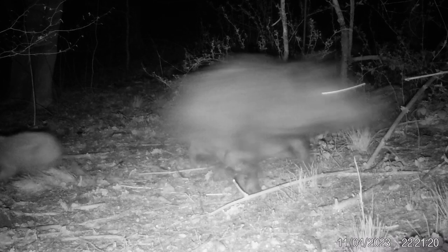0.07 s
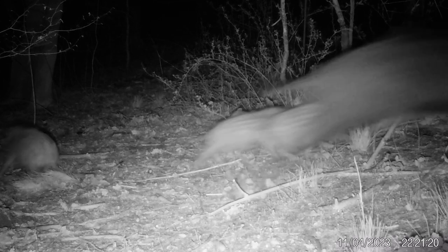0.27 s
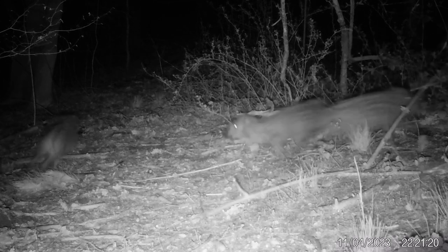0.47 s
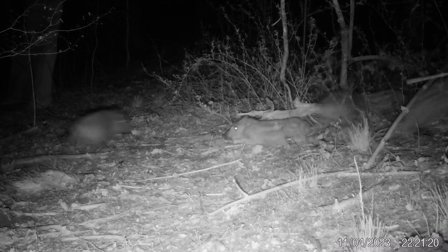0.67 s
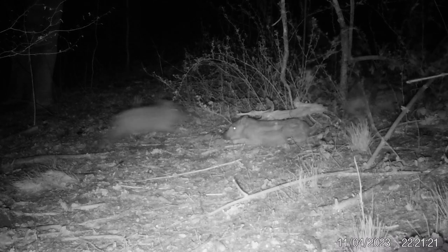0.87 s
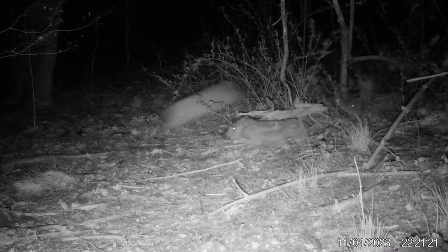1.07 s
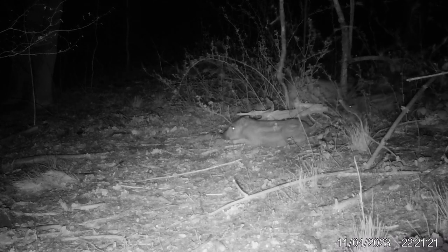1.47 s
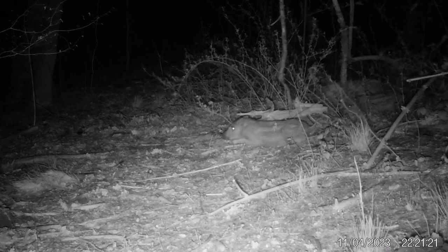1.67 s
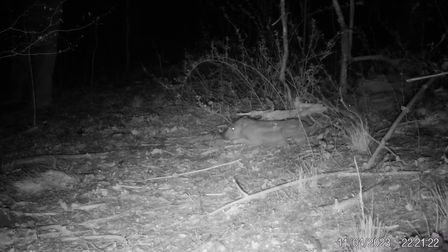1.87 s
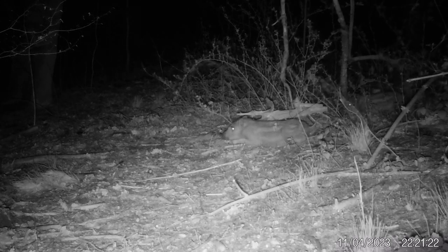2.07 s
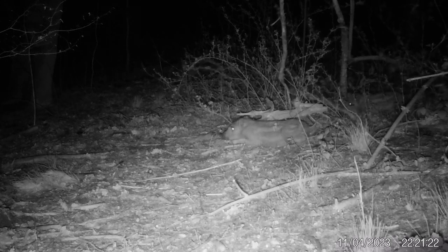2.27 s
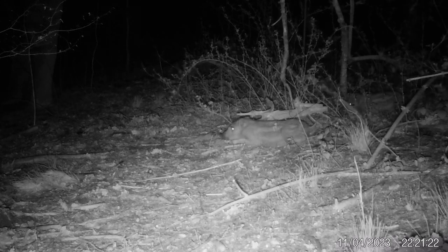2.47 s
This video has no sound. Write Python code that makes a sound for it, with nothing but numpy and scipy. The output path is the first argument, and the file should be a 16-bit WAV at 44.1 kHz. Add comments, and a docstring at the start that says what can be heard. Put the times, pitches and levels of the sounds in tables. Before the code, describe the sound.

Wild boars run through woodland leaf litter, starting near the microphone with snapping twigs and one loud branch crack. Their scuffing and low rumble fade as the crackling leaves grow duller with distance, above a faint hiss.

```python
"""Wild boars bolt past and away through dry leaf litter in a wood at night.
Crushed leaves crackle and dull with distance; the microphone housing adds peaks near 3.7 and 6.6 kHz.
Hooves and bodies scuff over a low rumble, twigs snap, and a dry branch breaks close by and rings.
The trunks scatter each crack back. A faint, steady hiss lies under it all."""
import sys
import numpy as np
from scipy import signal
from scipy.fft import rfft, irfft
from scipy.io import wavfile

SR = 44100
rng = np.random.default_rng(int(sys.argv[2]) if len(sys.argv) > 2 else 0)


def generate_wav(sig):
    """Save sig (samples, or channels by samples) to the path in sys.argv[1] as 16-bit PCM at SR."""
    pcm = np.round(np.clip(np.atleast_2d(sig).T, -1, 1) * 32767).astype(np.int16)
    wavfile.write(sys.argv[1], SR, pcm)


N = 110250

# tone colour of leaf and twig crackle as heard through the microphone housing: f/Hz, level/dB
CRACKLE_COLOUR = [(600, -38), (1400, -12), (1750, -17.5), (2300, -14), (3100, -5), (3750, 3), (4060, -2.5),
                  (4400, -1), (5160, -8), (5850, -8.5), (6200, -1), (6540, 1.5), (7210, -2.5), (8000, -2),
                  (9910, -9), (11000, -21), (12000, -32.5), (12500, -46)]


def amp(db):
    """Decibels to gain."""
    return 10 ** (np.asarray(db) / 20)


def unit(x):
    """Scale to rms 1."""
    return x / np.sqrt(np.mean(x ** 2) + 1e-20)


def along(points, hz):
    """Interpolate (f/Hz, value) points on a log frequency axis."""
    f, values = np.transpose(points)
    return np.interp(np.log(hz + 1), np.log(f + 1), values)


def fader(points):
    """Gain for each sample from (t/s, level/dB) points."""
    return amp(np.interp(np.arange(N) / SR, *np.transpose(points)))


def coloured(x, spectrum, pitch_hz=1000, fall_db=0):
    """EQ of unit power gain; fall_db cuts that much per octave either side of pitch_hz."""
    hz = np.fft.rfftfreq(2 * N, 1 / SR)
    octaves_off = np.abs(np.log2((hz + 1) / pitch_hz))
    gain = unit(amp(along(spectrum, hz) - fall_db * octaves_off))
    # minimum phase, so nothing rings ahead of an attack
    cepstrum = irfft(np.log(np.maximum(gain, 1e-5)))
    cepstrum[1:N] *= 2
    cepstrum[N + 1:] = 0
    return irfft(rfft(x, 2 * N) * np.exp(rfft(cepstrum)))[:N]


def noise(spectrum):
    """Steady coloured noise of rms 1."""
    return unit(coloured(rng.standard_normal(N), spectrum))


def decay(t, t60):
    """Exponential fall of 60 dB in t60 seconds."""
    return np.exp(-np.log(1000) * t / np.maximum(t60, 1e-3))


def at(start_s, x):
    """Delay a sound to its cue."""
    return np.pad(x, (max(round(start_s * SR), 0), 0))[:N]


def leaf_litter():
    """Trampled leaves crackle in tiny grains over a blur of rustle, duller with distance."""
    # surges of crushing underfoot: t/s, level/dB
    surges = [(0, -60.5), (.05, -63), (.17, -64.5), (.22, -63.5), (.39, -51.5), (.43, -63), (.475, -52.5),
              (.53, -59), (.6, -58.5), (.655, -54), (.7, -61.5), (.74, -55.5), (.78, -57.5), (.84, -54),
              (.92, -61), (1.01, -57.5), (1.11, -66), (1.18, -58.5), (1.24, -58.5), (1.33, -61.5),
              (1.41, -58.5), (1.52, -62.5), (1.6, -57.5), (1.77, -60), (1.795, -56), (1.86, -61.5),
              (1.96, -59.5), (2.1, -64), (2.2, -57.5), (2.26, -64), (2.39, -65.5), (2.42, -61.5),
              (2.5, -59.5)]
    grains_per_s, spread_db, grain_share = 1500, 4, 0.22
    sizes = amp(spread_db * np.minimum(rng.exponential(size=N), 4)) * rng.choice([-1, 1], N)
    grains = unit(sizes * (rng.random(N) < grains_per_s / SR))
    crush = np.sqrt(grain_share) * grains + np.sqrt(1 - grain_share) * rng.standard_normal(N)
    near = coloured(crush, CRACKLE_COLOUR, pitch_hz=7000, fall_db=3)
    far = coloured(crush, CRACKLE_COLOUR, pitch_hz=3650, fall_db=3)
    distance = np.clip(np.arange(N) / SR / 1.9, 0, 1)  # fully far at 1.9 s
    return fader(surges) * ((1 - distance) * near + distance * far)


def boar_pass():
    """The nearest boar brushes past and is gone."""
    # fade of the passing body: t/s, level/dB
    fade = [(0, -57), (.08, -60.5), (.2, -61), (.35, -68), (.8, -69.5), (1.4, -95)]
    # its bass-heavy rush: f/Hz, level/dB
    colour = [(15, -8), (40, 10), (90, 5.5), (160, -2), (650, -6.5), (780, 3.5), (950, -5), (2200, 3),
              (3500, -8.5), (6000, -35), (12000, -64)]
    return fader(fade) * noise(colour)


def scuffing():
    """Hooves and bodies scuff dully and fade with distance."""
    # fade of the retreat: t/s, level/dB
    fade = [(0, -53), (.1, -57), (.3, -57.5), (.55, -61.5), (1.2, -67), (2.1, -75.5), (2.5, -75)]
    # midrange friction: f/Hz, level/dB
    colour = [(40, -15.5), (150, -10), (400, -4.5), (520, -2), (630, -3.5), (780, 2), (920, -2),
              (1250, -2.5), (1500, -5.5), (1700, -11), (2300, -8.5), (3500, -11), (6000, -37), (12000, -57)]
    return fader(fade) * noise(colour)


def rumble():
    """A low rumble sinks and swells under the running."""
    # swells of the rumble: t/s, level/dB
    swells = [(0, -68.5), (.6, -79.5), (.97, -73.5), (1.1, -76), (1.3, -72), (1.55, -83.5), (2.5, -81.5)]
    # bass hump near 128 Hz: f/Hz, level/dB
    colour = [(20, -13), (60, -11.5), (95, -4.5), (128, 2), (170, -8.5), (400, -37), (2000, -80)]
    return fader(swells) * noise(colour)


def hiss():
    """A faint, steady bed of broadband noise."""
    # colour of the noise floor: f/Hz, level/dB
    colour = [(15, 0.5), (40, -1.5), (80, -2), (125, -2.5), (170, -2), (300, -5), (700, -10), (1150, -6),
              (1750, -14), (2700, -9), (3700, -8), (5500, -13.5), (6700, -26), (10000, -14.5), (11000, -35),
              (12400, -35.5)]
    return amp(-67.5) * noise(colour)


def fracture(t60):
    """A fast-dying volley of tearing fibres."""
    return rng.choice([-1., 1.], N) * decay(np.arange(N) / SR, t60)


def trunk_scatter():
    """Many trunks scatter a crack into a diffuse tail; the treble dies first."""
    # reverb time among the trees: f/Hz, t60/s
    reverb_times = [(500, 0.7), (1500, 0.35), (3500, 0.51), (7000, 0.26), (11000, 0.25)]
    rise_s = 0.0023
    hz, t, bands = signal.stft(rng.standard_normal(N), SR, nperseg=256)
    bands *= decay(t, along(reverb_times, hz)[:, None])
    tail = signal.istft(bands, SR, nperseg=256)[1][:N]
    return tail * (1 - np.exp(-np.arange(N) / SR / rise_s))


def twigs():
    """Twigs snap in short cracks; thin ones are higher and far ones carry more echo."""
    # snaps: t/s, level/dB, pitch/Hz, fall off the pitch/(dB per octave), t60/s, echo re crack/dB
    snaps = [(0.017, -49, 6400, 7, .031, 0), (.044, -50, 6500, -6, .02, 4),
             (.063, -46, 6300, 15, 0.014, 0.5), (0.2096, -37, 3000, 2.5, 0.021, 0),
             (.229, -35.5, 7700, 6, 0.021, -6), (.2735, -34.5, 2150, 31, .022, -10),
             (0.4561, -45, 7000, 17, 0.01, 5), (.561, -45, 6760, 15, 0.0078, -6),
             (.63, -27.5, 7340, 33, 0.0057, -17), (.631, -50, 2100, 20, 0.048, -3),
             (0.6316, -43.5, 9650, 15, 0.049, -9), (.801, -45, 2600, 60, 0.013, -2),
             (.802, -48, 7400, 8, .022, -8), (.8158, -43.5, 4030, 45, 0.017, -10),
             (0.8223, -50, 3860, 48, 0.018, -8), (1.2128, -35, 7500, 1, 0.009, -1.5),
             (1.2131, -42, 3850, 55, .022, -7), (1.224, -51.5, 4400, 10, 0.13, 1.5),
             (1.383, -44.5, 6740, 19, 0.015, -11), (1.451, -49.5, 4400, 0, 0.035, -5)]
    echo_focus = 0.23  # the echo keeps this share of a twig's fall per octave
    out = np.zeros(N)
    for start_s, db, hz, fall_db, t60, echo_db in snaps:
        crack, echo = fracture(t60), trunk_scatter()
        echo *= amp(echo_db) * np.linalg.norm(crack) / np.linalg.norm(echo)
        crack = coloured(crack, CRACKLE_COLOUR, hz, fall_db)
        echo = coloured(echo, CRACKLE_COLOUR, hz, echo_focus * fall_db)
        out += amp(db) * at(start_s, crack + echo)
    return out


def branch_break():
    """One hard blow and a volley of tearing fibres; the wood rings, and the trunks answer."""
    # modes of the dry branch: f/Hz, level/dB, t60/s
    modes = [(1480, -15, 0.039), (2310, -18.5, 0.035), (2870, -11, 0.044), (3370, 0, 0.023),
             (3704, -9.5, 0.04), (4310, -8.5, 0.038), (4603, -12, 0.028), (6200, -10.5, 0.029),
             (6750, -4, 0.013), (7155, 4.5, 0.015), (7700, -8, 0.033), (8140, -12, 0.02), (8360, -6, 0.02),
             (10040, -10.5, 0.022)]
    # colour of the close crack: f/Hz, level/dB
    crack_colour = [(60, -41), (200, -27), (620, -25), (1010, -22), (1550, -3), (1880, -19.5),
                    (2500, -17.5), (3400, -4.5), (5400, -15), (6700, 1), (8310, -7), (10100, -13),
                    (11000, -38), (12000, -25), (12800, -53)]
    # colour of its echo among the trunks: f/Hz, level/dB
    echo_colour = [(150, -50), (300, -36), (700, -29), (1100, -18.5), (1550, -12), (1800, -12.5),
                   (2250, -5), (2600, -10), (3000, -2), (3450, -0.5), (4300, -0.5), (5400, -7.5), (6600, 2),
                   (8240, -3.5), (10100, -8.5), (11000, -26), (12400, -41)]
    break_s, ring_rise_s, slap_delay_s = 0.244, 0.00058, 0.023
    t = np.arange(N) / SR
    ring = sum((-1) ** k * amp(db) * np.sin(2 * np.pi * hz * t) * decay(t, t60)
               for k, (hz, db, t60) in enumerate(modes))
    ring *= 1 - np.exp(-t / ring_rise_s)  # the modes build up as the wood splits
    blow = amp(-10.5) * (t == 0)
    fibres = amp(-19.5) * fracture(t60=0.028)
    direct = amp(-15.5) * ring + coloured(blow + fibres, crack_colour)
    slap = amp(-19) * at(slap_delay_s, direct)  # a near trunk throws the crack back
    echo = amp(-32) * coloured(trunk_scatter(), echo_colour)
    lingering_note = amp(-41.5) * coloured(trunk_scatter(), echo_colour, pitch_hz=3430, fall_db=104)
    return at(break_s, direct + slap + echo + lingering_note)


def scene():
    """Mono mix of breaking wood and running boars over the hiss."""
    wood = branch_break() + twigs()
    running = leaf_litter() + boar_pass() + scuffing() + rumble()
    return (wood + running + hiss())[None]


def record(dry):
    """A brick-wall low-pass takes off the top of the treble."""
    cutoff_hz = 12450
    hz = np.fft.rfftfreq(2 * N, 1 / SR)
    return irfft(rfft(dry, 2 * N) * (hz < cutoff_hz))[:, :N]


dry = scene()
out = record(dry)
generate_wav(out)
```